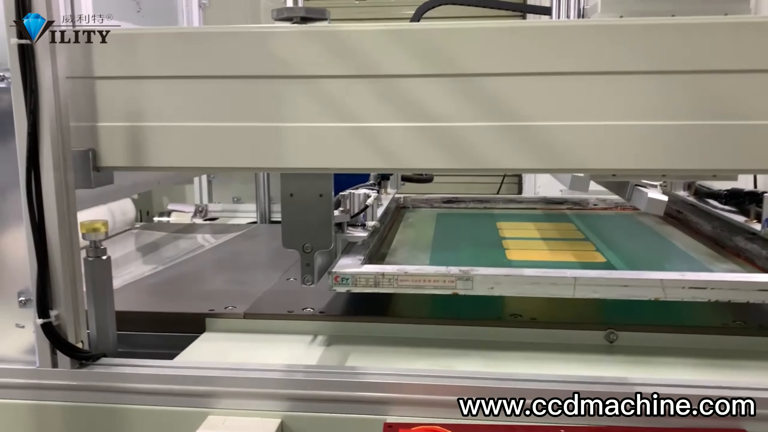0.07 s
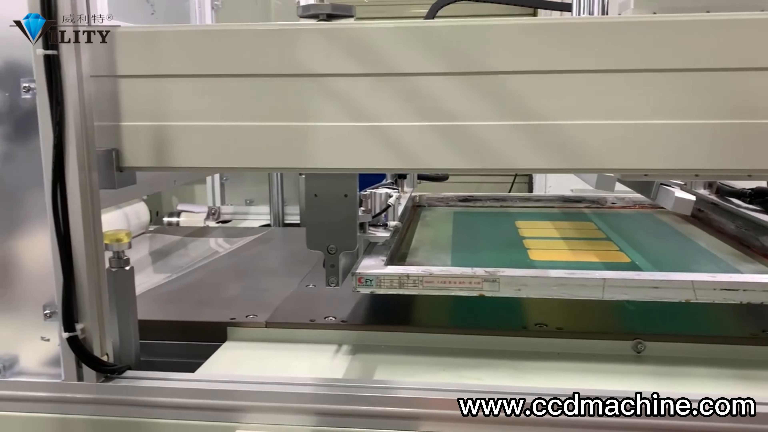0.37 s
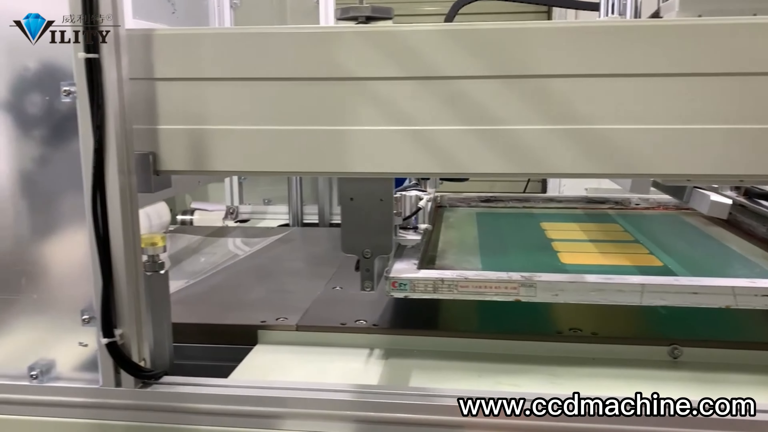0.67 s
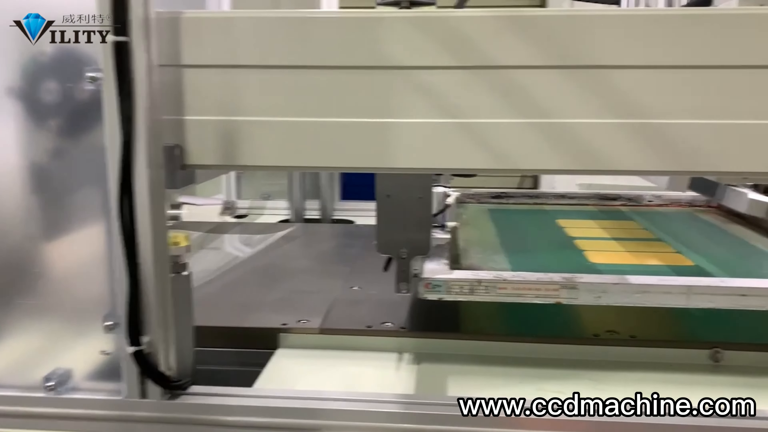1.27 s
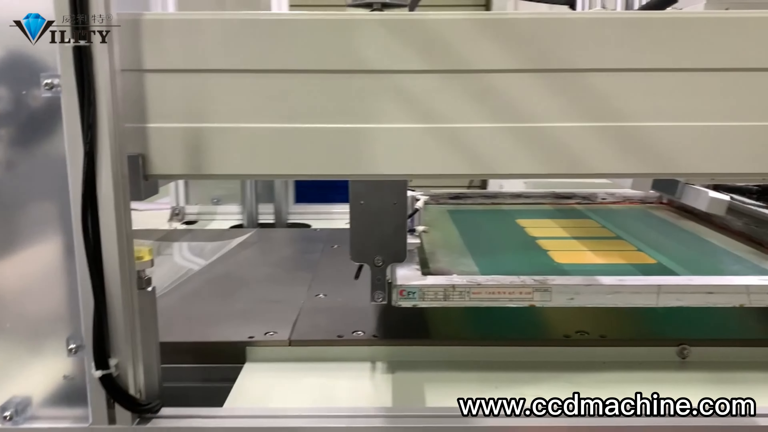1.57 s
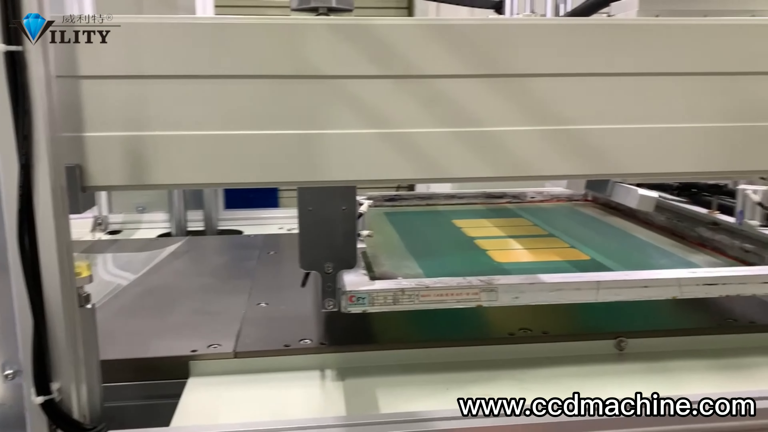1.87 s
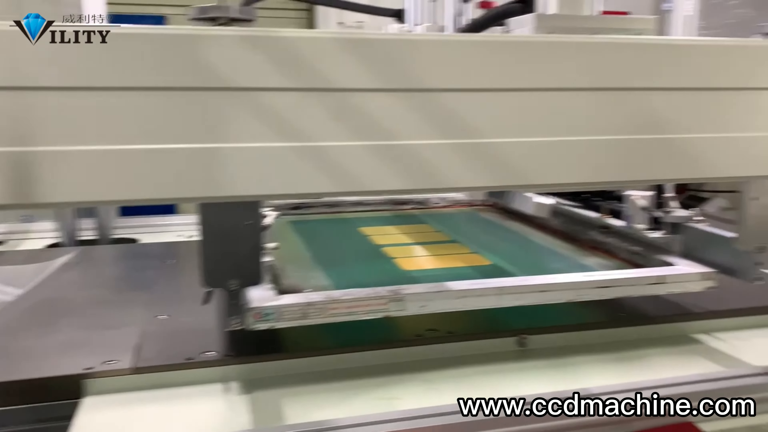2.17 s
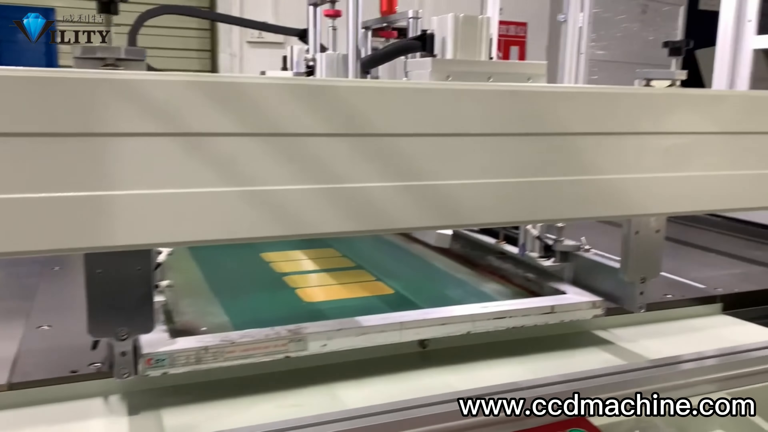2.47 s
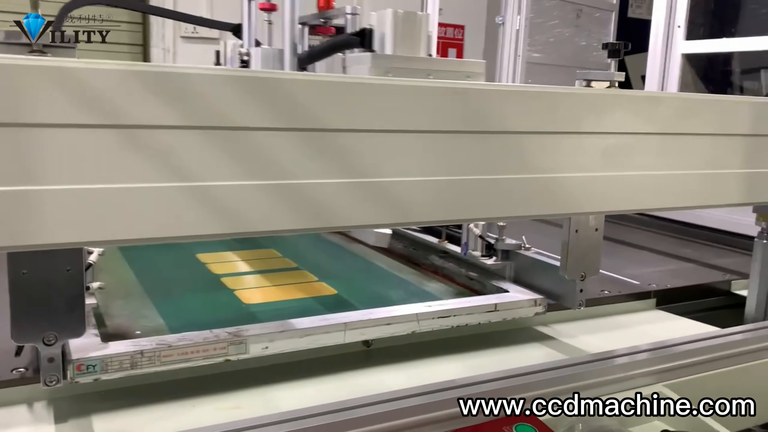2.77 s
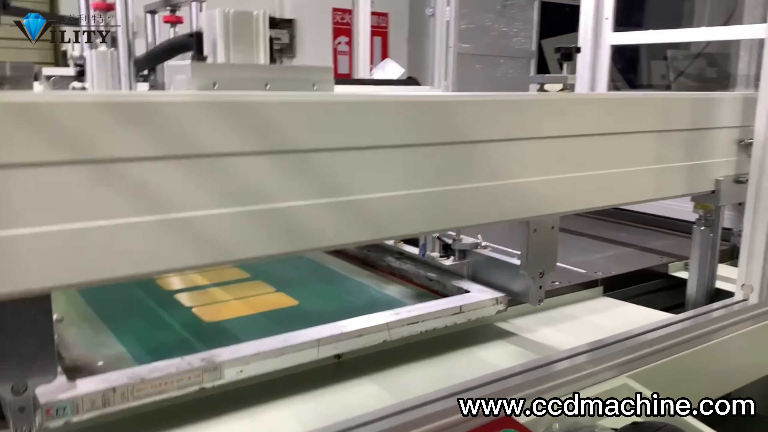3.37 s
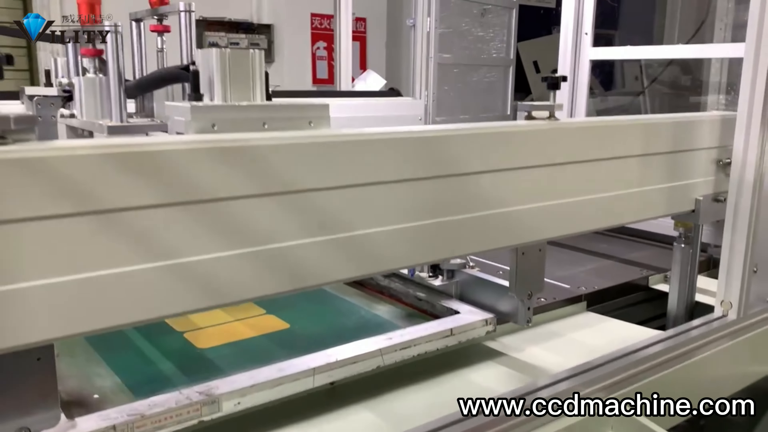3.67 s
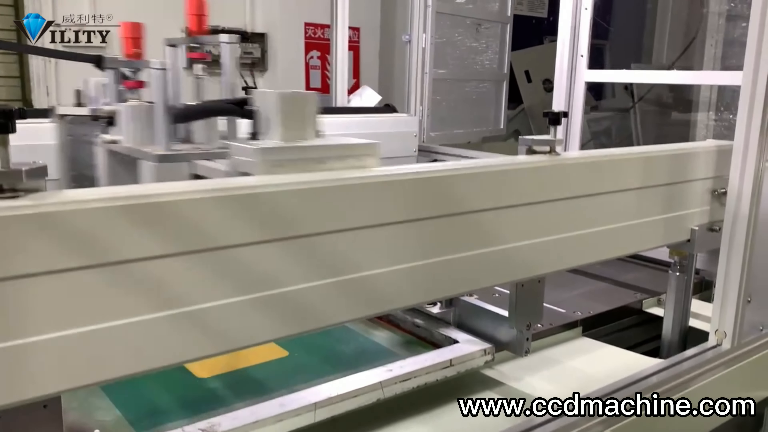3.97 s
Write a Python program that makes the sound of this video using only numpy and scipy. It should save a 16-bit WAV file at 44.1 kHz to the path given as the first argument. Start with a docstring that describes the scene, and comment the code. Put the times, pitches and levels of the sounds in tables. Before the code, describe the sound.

A screen-printing machine runs in a factory hall with steady rumble, hum, whines and hissing air. At 0.3 seconds valves puff, the print head clunks and a cylinder slides with a thin whistle. Another puff and clunk come at 1.7 seconds, and the rumble changes tone. Loose parts knock and rattle. The loudest puff and a third clunk land near 3.2 seconds; around 4, a last puff and rising whine.

```python
"""A screen-printing machine runs in a factory hall, over rumble, mains hum, motor whines and leaking air.
At 0.3 s valves puff, the print head clunks into place and a cylinder slides with a thin air whistle.
At 1.7 s come another puff and clunk, and the rumble changes tone as the microphone moves along the machine.
Loose parts knock and rattle on, and the loudest puff comes with a third clunk near 3.2 s.
Just before the end, at 4 s, a last puff escapes and a servo motor starts up."""
import sys
import numpy as np
from scipy import signal
from scipy.fft import rfft, irfft, next_fast_len
from scipy.io import wavfile
from scipy.ndimage import map_coordinates

SR = 44100
rng = np.random.default_rng(int(sys.argv[2]) if len(sys.argv) > 2 else 0)


def unload_audio(sound):
    """Save the sound as a 16-bit wav file, at the path given as the first command line argument."""
    columns = np.transpose(np.atleast_2d(sound))
    # keep every value between -1 and 1, then stretch to whole-number steps
    steps = np.round(np.clip(columns, -1, 1) * 32767)
    wavfile.write(sys.argv[1], SR, steps.astype(np.int16))


N = 176400  # 4 seconds

# Below, fade_s is the time to die away by 60 dB; gain_db shapes a tone and does not set its level.
# Valve puffs: start_s, level_db, rise_s, hold_s, fade_s, treble_tilt_db_per_octave
VALVE_PUFFS = [(0.324, -29.5, .003, .008, 0.12, 2.5), (.335, -32.5, .01, 0.03, 0.87, 3),
               (0.536, -37, .006, .012, .15, 7), (1.739, -30, .016, .012, 0.41, 1.5),
               (1.81, -39.5, 0.017, .06, .6, -1.5), (2.788, -33.5, 0.041, 0.1, .3, 5),
               (3.154, -23.5, 0.016, 0.026, 0.32, 2), (3.918, -32, .025, .05, .4, 4)]
# Tone of the vented air: frequency_hz, gain_db
PUFF_TONE = [(300, -4), (1200, -1), (3500, 0), (5500, -1.5), (8000, 1), (10500, 2), (12000, 0), (13500, -4),
             (15500, -5)]
# Tone of the hall's echo of a puff: frequency_hz, gain_db
ECHO_TONE = [(400, 5), (2000, 3), (4000, 0), (7000, -5), (15000, -10)]
# Print head clunks: start_s, level_db, pitch_hz, fade_s, thud_db
HEAD_CLUNKS = [(.331, -24.5, 294, 0.25, -37), (1.743, -21.5, 419.3, 0.2, -24.5),
               (3.164, -26.5, 367, 0.083, -50)]
# Notes that ring together in a clunk: pitch_ratio, gain_db
CLUNK_NOTES = [(.6, -7), (0.721, -5), (1, 1.5), (1.16, -16), (1.45, -4.5), (2.3, -23)]
# Cylinder slide: start_s, level_db, rise_s, hold_s, fade_s, centre_hz, width_octaves
CYLINDER_STROKES = [(0.332, -31.5, 0.017, 0.2, 0.23, 760, 0.64)]
# Servo harmonics (1, 2, 3 and 4 times its pitch): level_db
SERVO_HARMONICS = [-26, -28, -40, -40]
# Light knocks of guides and stops: start_s, level_db, centre_hz
LIGHT_KNOCKS = [(.338, -31, 900), (.435, -34.5, 5500), (.755, -44, 3400), (1.765, -36, 2600),
                (1.859, -40, 2900), (2.18, -37, 1900), (2.728, -33.5, 2340), (2.915, -35, 1700),
                (3.18, -39, 3600), (3.205, -31.5, 1700), (3.702, -38, 3000)]
# Rattles of loose parts: start_s, length_s, level_db, centre_hz, width_octaves
LOOSE_RATTLES = [(0.391, .11, -31.5, 850, 0.66), (.37, 0.21, -45, 3000, 1), (1.78, .12, -44, 3000, 0.55),
                 (2.246, 0.36, -43, 1780, 0.46), (2.743, 0.21, -40, 1880, 0.51), (3.4, .4, -47, 1900, .6)]
# Hums and whines of motors and air lines: start_s, end_s, pitch_hz, width_hz, level_db
WHINE_TONES = [(-.2, 4.2, 100, 4, -38), (-.2, 4.2, 199, 12, -41.5), (.5, 1.9, 199, 8, -39),
               (1.08, 1.53, 62, 16, -36.5), (.5, 1.6, 546, 4, -44), (-.2, .55, 1092, 8, -45),
               (.68, 1.45, 1092, 9, -38.5), (-.2, .6, 2562, 14, -52), (.6, 1.9, 2562, 20, -49),
               (1.2, 1.67, 2545, 30, -48), (.6, .85, 3290, 60, -50), (.85, 1.5, 3290, 90, -55),
               (1.93, 3.7, 666, 5, -39), (1.95, 2.12, 672, 15, -36), (2.2, 4.2, 917, 6, -49),
               (2.2, 4.2, 1019, 6, -46), (2.0, 3.7, 1118, 6, -46), (2.3, 4.2, 2620, 10, -53),
               (2.3, 4.2, 3976, 10, -60), (2.3, 4.2, 4480, 10, -59), (2.3, 4.2, 4631, 10, -61),
               (2.3, 4.2, 6833, 10, -61), (2.1, 4.2, 10575, 40, -56), (.9, 1.75, 7995, 20, -51),
               (1.08, 1.47, 7995, 5, -38)]
# Tone of the leaking air: frequency_hz, gain_db
LEAK_TONE = [(4000, -8), (5500, -1.5), (6500, 0), (9200, .5), (10500, 3), (12000, 1), (13500, -1.5),
             (15500, -1)]
# Loudness of the leak: time_s, level_db
LEAK_LEVELS = [(0, -37), (1.3, -36), (2, -36), (2.6, -38), (4, -38.5)]
# Tone of the hall's rumble at the microphone's first spot: frequency_hz, gain_db
FIRST_SPOT_TONE = [(20, -34), (35, -17), (55, -4), (80, -5), (104, -5), (140, -7), (190, -0.5), (240, -6),
                   (290, -4.5), (370, -5.5), (480, -7), (620, -10.5), (830, -9.5), (1080, -11.5),
                   (1300, -15.5), (1700, -16.5), (2300, -22.5), (3400, -25.5), (5000, -30.5), (7400, -35),
                   (10000, -107.5)]
# The same at its second spot: frequency_hz, gain_db
SECOND_SPOT_TONE = [(20, -30), (35, -19), (60, -4.5), (80, -4), (104, 0), (145, -9.5), (190, 1.5),
                    (240, -7.5), (290, -4), (370, -9), (470, -8), (530, -11.5), (590, -8.5), (720, -9),
                    (830, -14.5), (1050, -10.5), (1300, -17), (1800, -18), (2400, -21.5), (3400, -27.5),
                    (5000, -31), (8000, -41), (11000, -78)]
# Peaks and dips made by sound bouncing between metal plates: frequency_hz, depth_db
PLATE_RIPPLE = [(2000, 4.2), (7000, 3.2), (10000, 1.3)]
# Stereo width, low for centred and high for wide: frequency_hz, side_minus_mid_db
STEREO_WIDTH = [(60, -15), (150, -16), (350, -9), (700, -3.5), (1100, -3), (1700, 1.5), (3000, -1.5),
                (5500, 0), (6600, -10), (7400, -1.5), (8000, 16), (8700, 52), (9700, -5.5), (11000, -16),
                (12200, -1), (13400, 31), (14600, 3), (15400, -18)]


def valves(pivot_hz=6000, echo_db=-5, echo_rise_s=.029, echo_fade_s=1):
    """Valves vent sputtering puffs of air, and the hall answers each with a duller echo."""
    puffs, echo_power, ring = np.zeros((2, N)), np.zeros(N), plates()
    for start, db, rise, hold, fade, tilt in VALVE_PUFFS:
        air = noise(lambda hz: amp(along(PUFF_TONE, hz) + tilt * np.log2((hz + 500) / pivot_hz))
                    * ring(hz))
        puffs += amp(db) * envelope(start, rise, hold, fade) * air
        echo_power += (amp(db + echo_db) * envelope(start, echo_rise_s, hold, echo_fade_s)) ** 2
    sputter = amp(wobble(rate_hz=70))
    echo = np.sqrt(echo_power) * noise(lambda hz: amp(along(ECHO_TONE, hz)) * ring(hz))
    return puffs * sputter + echo


def clunks(rise_s=.011, rattle_db=-5, thud_hz=69.3, thud_fade_s=.33):
    """The print head meets a padded stop: its carriage rings and rattles, and the frame thuds."""
    out = np.zeros((2, N))
    for start, db, hz, fade, thud_db in HEAD_CLUNKS:
        t = clock() - start
        ring = unit(sum(amp(gain) * sine_pair(hz * ratio * t) for ratio, gain in CLUNK_NOTES))
        rattle = amp(rattle_db) * noise(band(hz, octaves=.32))
        out += amp(db) * envelope(start, rise_s, 0, fade) * (ring + rattle)
        out += amp(thud_db) * envelope(start, rise_s, 0, thud_fade_s) * np.sin(2 * np.pi * thud_hz * t)
    return out


def cylinder():
    """A slide rubs and judders along its guides."""
    rub = sum(amp(db) * envelope(start, rise, hold, fade) * noise(band(hz, octaves))
              for start, db, rise, hold, fade, hz, octaves in CYLINDER_STROKES)
    return rub * amp(wobble(rate_hz=90))


def whistle(start_s=.32, level_db=-32.5, pitch_hz=8450, fall_hz_per_s=2400):
    """Air squeezes through a narrow valve; its hissy whistle sinks in pitch as the pressure falls."""
    jet = noise(band(pitch_hz, octaves=.07))
    glide = np.exp(-1j * np.pi * fall_hz_per_s * (clock() - start_s) ** 2)
    falling_jet = np.real(signal.hilbert(jet) * glide)  # slides every frequency down together
    return amp(level_db) * envelope(start_s, rise_s=.18, hold_s=.045, fade_s=.12) * falling_jet


def servo(start_s=3.968, pitch_hz=540, climb_hz_per_s=1540, rise_s=.016):
    """A motor spins up with a rising whine."""
    t = np.maximum(clock() - start_s, 0)
    cycles = pitch_hz * t + climb_hz_per_s * t ** 2 / 2
    tone = sum(amp(db) * sine_pair(k * cycles) for k, db in enumerate(SERVO_HARMONICS, 1))
    return np.sqrt(2) * np.minimum(t / rise_s, 1) * tone


def knocks():
    """Small metal parts touch and ring briefly."""
    out, ring = np.zeros((2, N)), plates()
    for start, db, centre in LIGHT_KNOCKS:
        metal = noise(lambda hz: band(centre, octaves=.6)(hz) * ring(hz))
        out += amp(db) * envelope(start, rise_s=.005, hold_s=0, fade_s=.15) * metal
    return out


def rattles(taps_per_s=55):
    """Loose parts chatter in uneven runs of tiny taps."""
    out, ring = np.zeros((2, N)), plates()
    for start, length, db, centre, octaves in LOOSE_RATTLES:
        taps = rng.random((40, 2))[:int(length * taps_per_s) + 1]
        power = sum(size * envelope(start + (k + late) / taps_per_s, .001, 0, fade_s=.09) ** 2
                    for k, (late, size) in enumerate(taps))
        chatter = np.sqrt(power * length * SR / power.sum())
        out += amp(db) * chatter * noise(lambda hz: band(centre, octaves)(hz) * ring(hz))
    return out


def whines(ramp_s=.08, scattered_share=.27):
    """Motors and air lines hum and whine; the hall scatters part of each tone, so it wavers."""
    out = np.zeros((2, N))
    for start, end, hz, width, db in WHINE_TONES:
        gate = np.clip(np.minimum(clock() - start, end - clock()) / ramp_s + .5, 0, 1)
        on = gate > 0
        t = clock()[on]
        for channel in range(2):
            real, imag = (smooth(points, 2 * width * t) for points in rng.standard_normal((2, 500)))
            waver = 1 + scattered_share * (real + 1j * imag)  # shakes both loudness and pitch
            tone = np.real(waver * np.exp(2j * np.pi * (hz * t + rng.random())))
            out[channel, on] += amp(db) * gate[on] * unit(tone)
    return out


def air_leak(flutter_db=.5):
    """Compressed air hisses out all the time inside the machine."""
    ring = plates()
    level_db = np.interp(clock(), *np.transpose(LEAK_LEVELS)) + flutter_db * wobble(rate_hz=16)
    return amp(level_db) * noise(lambda hz: amp(along(LEAK_TONE, hz)) * ring(hz))


def hall_rumble(level_db=-26.5, flutter_db=.45, ripple_db=1.7, ripple_step_hz=20):
    """Many machines rumble through the ringing hall; the tone changes as the microphone moves."""
    def spot(tone):
        ripple = rng.standard_normal(4000)
        return noise(lambda hz: amp(along(tone, hz) + ripple_db * smooth(ripple, hz / ripple_step_hz)))
    first = np.sqrt(1 - move_progress()) * spot(FIRST_SPOT_TONE)
    second = np.sqrt(move_progress()) * spot(SECOND_SPOT_TONE)
    return (first + second) * amp(level_db + flutter_db * wobble(rate_hz=14))


def plates(step_hz=38):
    """Sound bounces between metal plates: a filter with many narrow, random peaks."""
    ripple = rng.standard_normal(1000)
    return lambda hz: amp(along(PLATE_RIPPLE, hz) * smooth(ripple, hz / step_hz))


def move_progress(midway_s=1.844, length_s=.34):
    """How far the microphone has moved: 0 at the first spot, 1 at the second."""
    return np.clip((clock() - midway_s) / length_s + .5, 0, 1)


def microphone_turn(pair, first_lag_s=7e-5, second_lag_s=3.2e-6):
    """As the microphone turns, the left side lags less: the sound drifts from the right to near centre."""
    shift = (first_lag_s + (second_lag_s - first_lag_s) * move_progress()) * SR / 2
    return np.array([map_coordinates(x, [np.arange(N) - sign * shift], mode="mirror")
                     for x, sign in zip(pair, (1, -1))])


def spread(pair):
    """Mix two signals into left and right, with a stereo width for each frequency."""
    angle = lambda hz: np.arctan(amp(along(STEREO_WIDTH, hz)))
    mid, side = filtered(pair, lambda hz: np.array([np.cos(angle(hz)), np.sin(angle(hz))]))
    return np.array([mid + side, mid - side])


def amp(db):
    """Turn decibels into a multiplier."""
    return 10 ** (np.asarray(db) / 20)


def unit(x):
    """Scale to an average strength (rms) of 1."""
    return x / np.sqrt(np.mean(x ** 2) + 1e-20)


def clock():
    """Time of each sample in seconds."""
    return np.arange(N) / SR


def along(table, hz):
    """Read between a table's rows on a log frequency scale."""
    frequencies, values = np.transpose(table)
    return np.interp(np.log(hz + 1), np.log(frequencies + 1), values)


def smooth(points, positions):
    """Read a smooth, looping curve through the points."""
    return map_coordinates(points, [positions], mode="wrap")


def wobble(rate_hz):
    """A smooth random curve that swings by about 1."""
    return smooth(rng.standard_normal(2000), clock() * rate_hz)


def filtered(x, gain_at):
    """Turn each frequency up or down by gain_at(hz)."""
    size = next_fast_len(N + SR // 2)
    return irfft(rfft(x, size) * gain_at(np.fft.rfftfreq(size, 1 / SR)), size)[..., :N]


def noise(gain_at):
    """Two unrelated filtered noises of strength 1."""
    return unit(filtered(rng.standard_normal((2, N)), gain_at))


def sine_pair(cycles):
    """Two sine waves, each starting at a random point in its cycle."""
    return np.sin(2 * np.pi * (cycles + rng.random((2, 1))))


def band(centre_hz, octaves):
    """A bell-shaped filter."""
    return lambda hz: np.exp(-.5 * (np.log2((hz + 1) / centre_hz) / octaves) ** 2)


def envelope(start_s, rise_s, hold_s, fade_s):
    """Loudness over time: rise, hold, die away."""
    t = clock() - start_s
    return np.clip(t / rise_s, 0, 1) * amp(-60 * np.maximum(t - rise_s - hold_s, 0) / fade_s)


def scene():
    """The machine and the hall behind it, in stereo."""
    rumble = microphone_turn(spread(hall_rumble()))
    machine = (air_leak() + whines() + valves() + clunks() + knocks() + rattles()
               + cylinder() + whistle() + servo())
    return rumble + spread(machine)


def record(dry, top_hz=15600):
    """Cut off the very highest treble."""
    return filtered(dry, lambda hz: hz < top_hz)


dry = scene()
out = record(dry)
unload_audio(out)
```